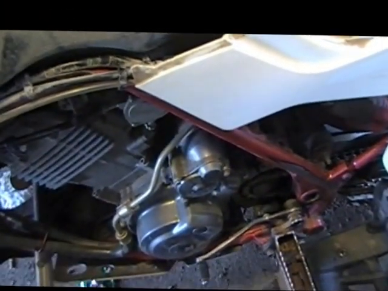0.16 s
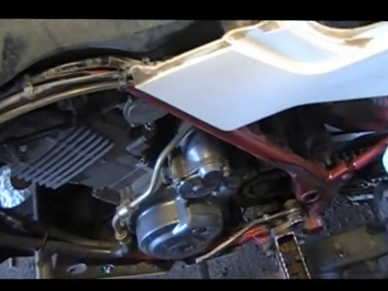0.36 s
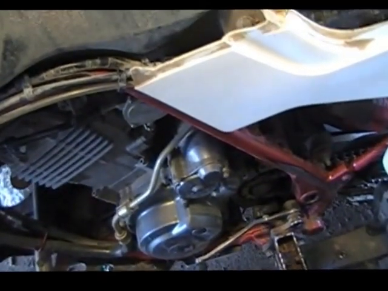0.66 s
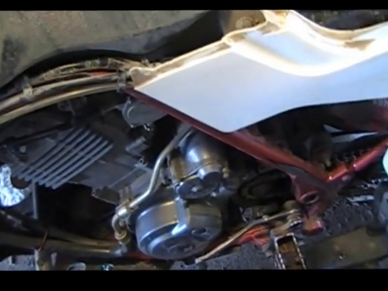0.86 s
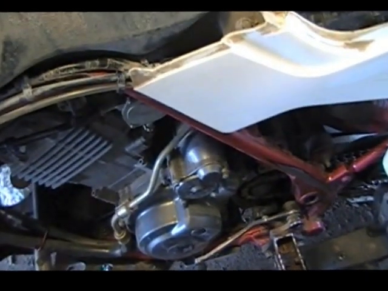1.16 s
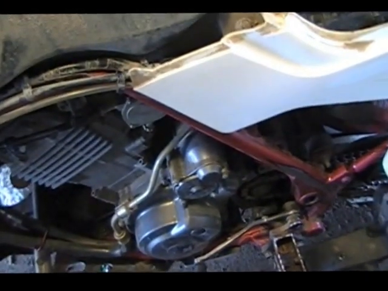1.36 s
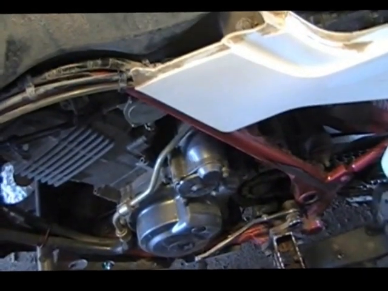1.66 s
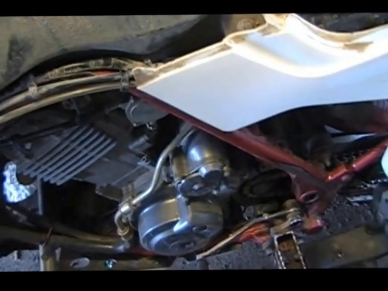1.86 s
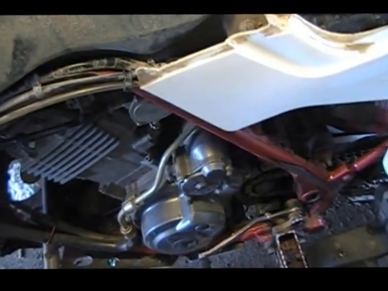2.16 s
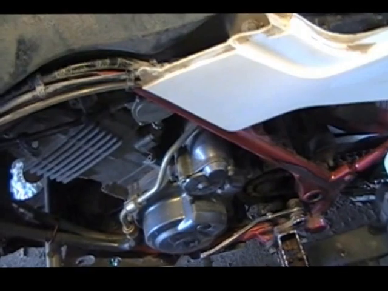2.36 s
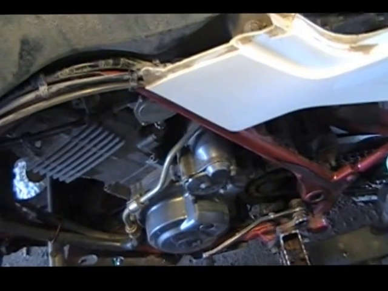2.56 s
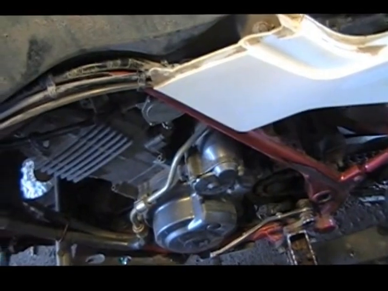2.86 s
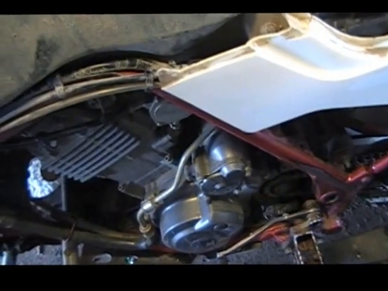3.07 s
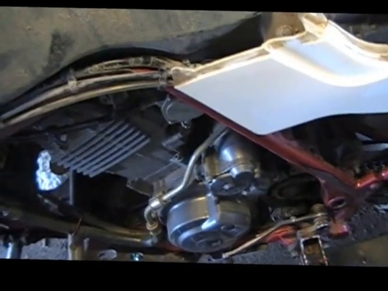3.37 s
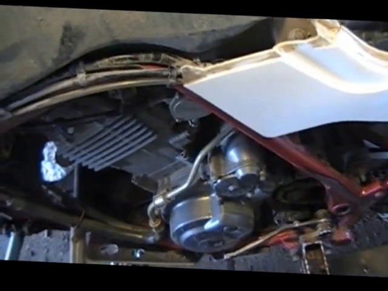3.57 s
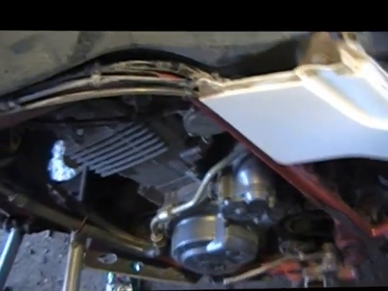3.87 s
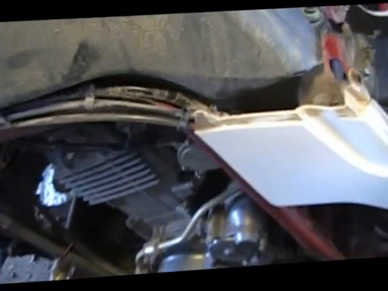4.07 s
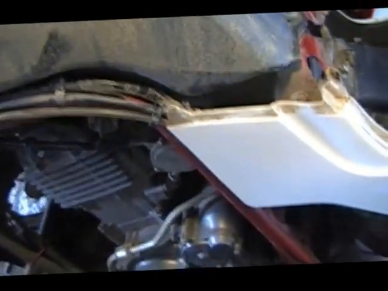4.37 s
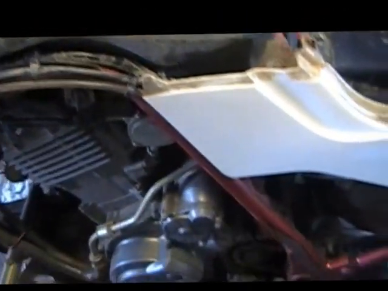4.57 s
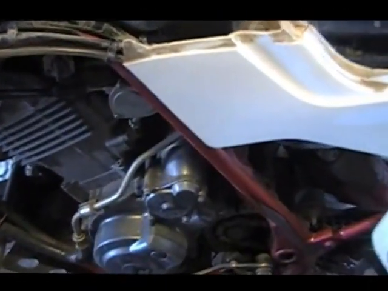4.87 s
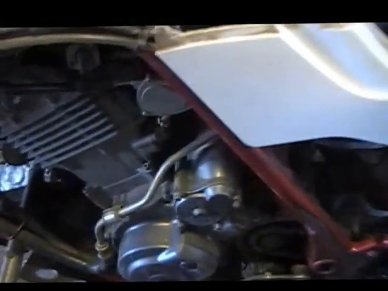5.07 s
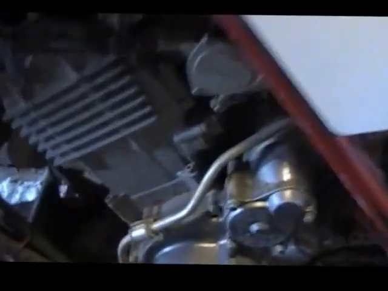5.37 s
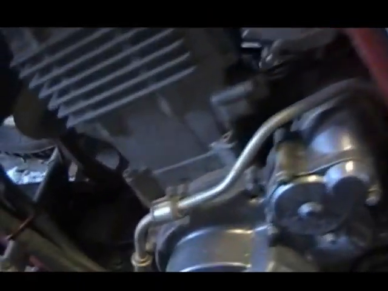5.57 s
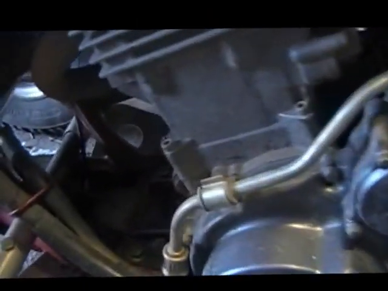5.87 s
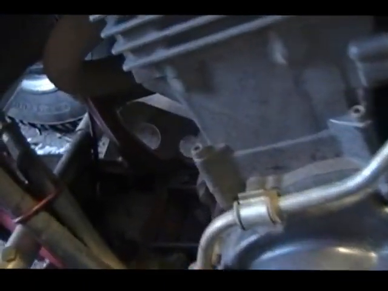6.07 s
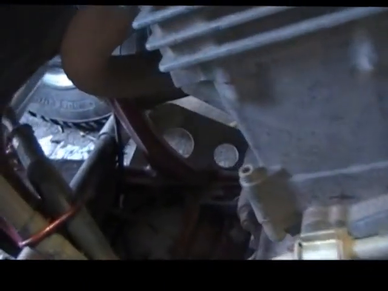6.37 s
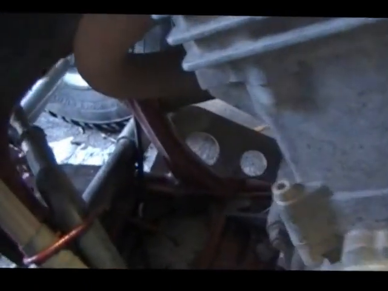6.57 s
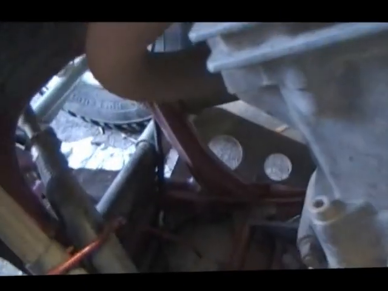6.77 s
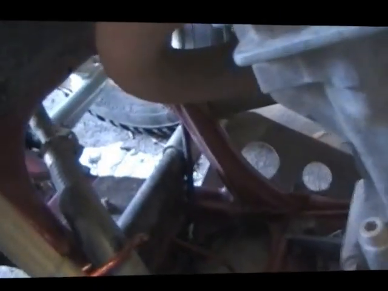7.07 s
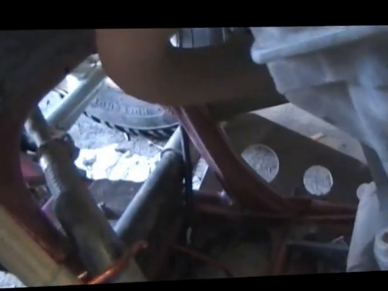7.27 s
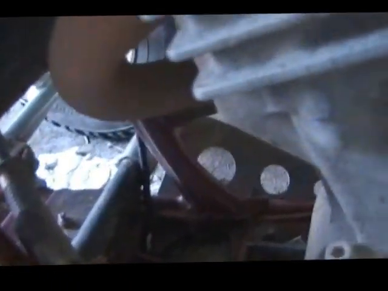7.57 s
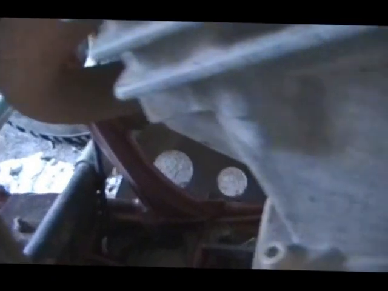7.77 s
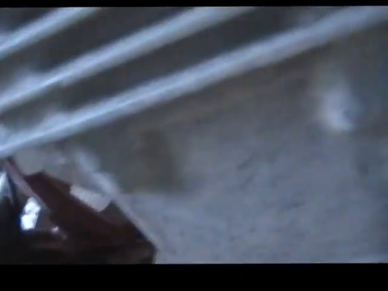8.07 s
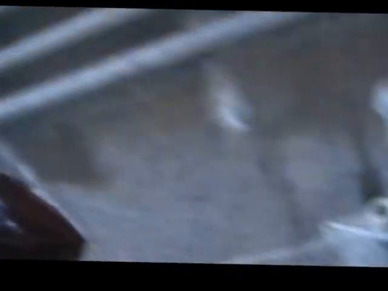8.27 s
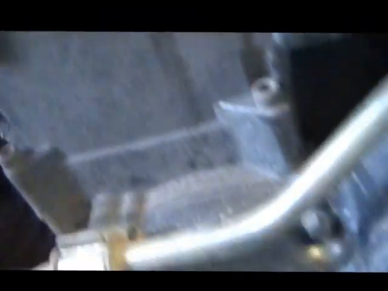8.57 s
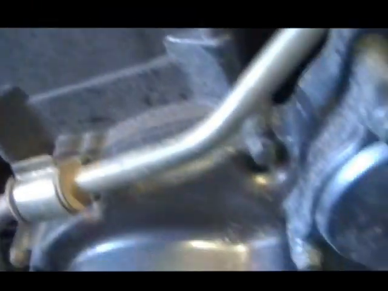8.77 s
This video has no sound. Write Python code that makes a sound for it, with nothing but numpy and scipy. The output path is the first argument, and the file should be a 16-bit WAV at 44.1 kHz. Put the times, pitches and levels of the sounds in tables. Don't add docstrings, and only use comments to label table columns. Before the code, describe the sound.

A faint knock dies away over still air and low hum. Clicks and a hard clack lead into labouring starter gears, a muffled kick, then a coasting whine. After a pause it cranks again and the small air-cooled engine starts, popping loudly and settling to a rapid steady idle. The near-mono camera microphone begins beside it and ends close to the fins, where bright mechanical clatter stands out over the softer exhaust.

```python
import sys
import numpy as np
from scipy import signal
from scipy.fft import rfft, irfft
from scipy.io import wavfile
from scipy.ndimage import uniform_filter1d

SR = 44100
rng = np.random.default_rng(int(sys.argv[2]) if len(sys.argv) > 2 else 0)


def log_audio(samples):
    frames = np.atleast_2d(samples).T
    limited = np.clip(frames, -1, 1)
    pcm = np.round(limited * 32767).astype(np.int16)
    wavfile.write(sys.argv[1], SR, pcm)


def attenuation_scalar(level_db):
    decades = np.asarray(level_db, float) / 20
    return 10 ** decades


N = 392931
t = np.arange(N) / SR
CATCH_S = 2.8914

# (frequency [Hz], signed share, time to fall 60 dB [s])
PIPE_RING = [(75, 0.21, 0.4), (147, -1.0, 0.066), (153, 0.46, 0.282), (193, -0.11, 0.261),
             (269, -0.72, 0.033), (289, 0.32, 0.175), (330, 0.52, 0.027), (445, 0.2, 0.035),
             (636, 0.03, 0.015)]
# (frequency [Hz], level [dB], time to fall 60 dB [s])
CAN_RING = [(334.5, -13.5, 0.061), (470, -66, 0.16), (528.6, -19.5, 0.21), (703, -22, 0.042)]
# (delay [ms], signed share)
ECHOES = [
    [(0.2, 1.03), (4.7, 0.3), (9.1, 0.25), (13.3, -0.37), (23.0, 0.15), (25.6, -0.3), (37.7, 0.14),
     (39.2, 0.2)],
    [(0.4, 0.98), (13.4, -0.36), (17.5, 1.27), (17.7, -1.2), (19.9, 0.21), (28.9, -0.53), (29.0, 0.4),
     (41.3, -0.2)],
    [(0.4, 0.8), (9.8, 0.39), (17.0, 0.58), (21.0, 0.34), (26.1, 0.24), (39.6, -0.11), (41.3, 1.12),
     (41.5, -1.31)],
]


def thumps():
    u = t[:5000]
    out = np.zeros((len(ECHOES), 5000))
    pipe = sum(share * attenuation_scalar(-60 * u / t60) * np.sin(2 * np.pi * hz * u) for hz, share, t60 in PIPE_RING)
    can = sum(attenuation_scalar(db - 60 * u / t60) * np.sin(2 * np.pi * hz * u) for hz, db, t60 in CAN_RING)
    ring = pipe + can * np.minimum(u / 0.026, 1)
    for heard, arrivals in zip(out, ECHOES):
        for ms, share in arrivals:
            add(heard, ms / 1000, share * ring)
    out *= np.clip((0.095 - u) / 0.035, 0, 1)
    return out / np.sqrt(np.mean(out[:, :2200] ** 2, axis=1))[:, None]


# (time [s], exhaust level [dB], nearness of metal [dB])
IDLE = [(2.98, -10.5, 5.5), (3.5, -10.5, 7), (4.0, -12.5, 4.5), (4.3, -15.5, 1.5), (5.2, -17.5, 1),
        (5.7, -17, 4), (6.05, -16, 6.5), (6.45, -16, 8), (7.0, -16, 7), (7.6, -15.5, 8.5), (8.0, -15, 9),
        (8.4, -14.5, 7.5), (8.8, -13, 8)]
# (time [s], place: 0 beside, 1 moving in, 2 close; past 2 the thump weakens)
CAMERA = [
    (2.9, 1),
    (3.7, 0.5),
    (4.2, 0.5),
    (5.4, 0.76),
    (6.1, 2.3),
    (9, 2.5),
]
# (time [s], level [dB], low-pass [Hz])
KICKS = [(1.0115, -7, 695), (1.106, -15.5, 160), (1.136, -19.5, 200), (1.219, -17, 158), (1.248, -19, 200),
         (1.385, -23.5, 150), (1.431, -19, 130), (1.55, -26, 129), (1.688, -32.5, 132), (2.297, -22.5, 140),
         (2.347, -23, 120), (2.48, -26, 120), (2.551, -7.5, 694), (2.653, -19, 170), (2.69, -21, 220),
         (2.767, -13.5, 597), (2.819, -18, 170)]


def exhaust():
    heard, out, fire = thumps(), np.zeros(N), at_angle(0)
    level = attenuation_scalar(np.interp(fire, *np.transpose(IDLE)[:2]) + 0.21 * rng.standard_normal(len(fire)))
    for s, gain, place in zip(fire, level, np.interp(fire, *np.transpose(CAMERA))):
        nearest_places = np.maximum(1 - abs(place - np.arange(len(ECHOES))), 0)
        add(out, s, gain * nearest_places @ heard)
    for s, db, hz in KICKS:
        add(out, s, attenuation_scalar(db) * signal.lfilter(*signal.butter(2, hz, fs=SR), heard[0]))
    kick_s, kick_db, _ = np.transpose(KICKS)
    rush = bursts(np.r_[fire, kick_s], np.r_[level, attenuation_scalar(kick_db)], 0.0093, 0.5)
    gas = band(band(rng.standard_normal(N), 71, 394), 50, 400)
    return out + attenuation_scalar(-11.0) * rush * evened(gas)


# (frequency [Hz], level [dB per Hz])
GRIND = [(88, -23), (150, -3), (270, 6), (450, 4), (694, 6), (812, 1.5), (2970, 2.5), (3210, 1.5),
         (4480, -7), (7320, 2), (12000, -15.5), (13700, -34), (16400, -100)]
# (frequency [Hz], width [Hz], level [dB])
HOUSING = [(2550, 120, -4), (3290, 55, -2), (3650, 50, -6), (3880, 60, -6), (5630, 90, -9), (6500, 70, -9),
           (7290, 80, -7), (8150, 70, -10)]
# (pinion bites [s], released [s], labouring level [dB], coasting fall [dB per s squared])
PRESSES = [
    (0.886, 1.66, -29, 393),
    (2.151, 2.89, -29, 68),
]
# (middle [s], half length [s], grind level [dB], whine level [dB], top whine [Hz])
SURGES = [(0.952, 0.075, -21.5, -32.5, 4300), (1.324, 0.064, -31.5, -39, 3400),
          (1.461, 0.084, -40.5, -40, 3300), (1.584, 0.038, -27, -35, 3300), (1.657, .035, -29, -34, 3700),
          (2.216, 0.067, -23, -32.5, 4300), (2.304, 0.063, -34, -50, 3300),
          (2.409, 0.055, -23, -26.5, 3500), (2.514, .035, -24, -35, 3740), (2.854, 0.15, -32, -53, 3300)]
# (level [dB], gain with effort [dB per dB], with coasting [dB per dB])
STRAIN = [(-32.5, 1.0944, 0.76), (-36, 0.94, 0.96), (-31.5, 0.65, .75), (-34, 0.5, 1.03)]
# (share of the whine's pitch, level [dB])
WHINE_ORDERS = [(.5, -18), (.76, -0.5), (1, 6), (1.33, -8.5)]


def starter():
    held, coast_db = np.zeros(N), np.zeros(N)
    for (bite, released, labour_db, fall), end in zip(PRESSES, [PRESSES[1][0], 9]):
        held += attenuation_scalar(labour_db) * (t > bite) * (t < end)
        coast_db -= fall * np.maximum(t - released, 0) ** 2 * (t < end)
    mid, half, grind_db, whine_db, top_hz = np.transpose(SURGES)[:, :, None]
    arch = np.maximum(1 - ((t - mid) / half) ** 2, 0)
    effort_db = 20 * np.log10(held + (attenuation_scalar(grind_db) * arch).sum(0) + 1e-9) + 30

    teeth = attenuation_scalar(1.8 * wobble(size=50) + 1.1 * wobble(size=600)) * rng.standard_normal(N)
    housing = sum(attenuation_scalar(db + 4 * wobble(size=1800)) * evened(resonate(teeth, hz, width))
                  for hz, width, db in HOUSING)
    grind = evened(colour(teeth, GRIND)) + attenuation_scalar(-15) * housing
    above_350, above_1500, above_5000 = [
        colour(grind, [(hz / 1.3, -60), (hz, -6), (hz * 1.3, 0)]) for hz in (350, 1500, 5000)]
    parts = [above_1500 - above_5000, above_5000, above_350 - above_1500, grind - above_350]
    out = sum(attenuation_scalar(db + slope * effort_db + fade * coast_db) * evened(part)
              for (db, slope, fade), part in zip(STRAIN, parts))

    nearest, strength = arch.argmax(0), arch.max(0)
    whine_hz = top_hz[nearest, 0] * (1 - 0.36 * (1 - strength))
    whine = sum(attenuation_scalar(db) * evened(resonate(teeth, share * whine_hz, 80)) for share, db in WHINE_ORDERS)
    return out * (held > 0) + whine * attenuation_scalar(whine_db[nearest, 0]) * strength ** 2


# (frequency [Hz], width [Hz], level close [dB], lost from beside [dB], lost under the fins [dB])
HEAD = [(2830, 45, -3, 6, 0), (3720, 70, 4, 10, 10), (4300, 60, 0, 6, -2), (6310, 300, -4, 0, 0),
        (7900, 700, -8, 0, 0)]
# (frequency [Hz], level [dB])
VALVE = [(1200, -24), (2500, -5), (4000, 13.5), (5000, 5.5), (7000, 9), (9000, 6), (12000, -7),
         (15500, -47)]


def valves():
    at, luck = at_angle(0.26), rng.standard_normal((len(at_angle(0)), 4))
    gain = attenuation_scalar(metal_db(at, part=0) + 6 + 0.75 * luck[:, 1])
    shape = bursts(at + 0.0014 * luck[:, 0], gain, 0.0019, 0.046)
    rattle = shape * attenuation_scalar(3 * wobble(size=40)) * rng.standard_normal(N)
    away = np.clip(1.8 - curve(CAMERA), 0, 1)
    under = np.interp(t, (6.95, 7.2), [0, 1])
    ring = 0
    for hz, width, db, lost_db, hid_db in HEAD:
        level = attenuation_scalar(db - lost_db * away - hid_db * under + 2 * wobble(size=3000))
        ring = ring + level * evened(resonate(rattle, hz, width))
    clatter = (evened(colour(rattle, VALVE)) + attenuation_scalar(-1) * evened(ring)) * np.std(rattle)

    at = at_angle(0.578)
    gain = attenuation_scalar(metal_db(at, part=1) + 14.5 + 2.5 * luck[:, 3])
    snap = bursts(at + 0.001 * luck[:, 2], gain, 0.0005, 0.016)
    snap *= rng.standard_normal(N) * np.interp(t, (3.1, 5.4), [0.2, 1])
    tick = body(band(snap, 2500, 8500), [(7300, 1400, 0), (4250, 150, -10), (2830, 120, -12)])
    tick = tick + attenuation_scalar(-16) * evened(colour(snap, VALVE))
    return clatter + evened(tick) * np.std(snap)


# (frequency [Hz], level [dB per Hz])
GEAR = [
    [(220, -11.5), (380, 6), (609, -4.5), (1010, -10.5), (1300, -11.5), (1470, -23.5), (1990, -16),
     (4650, -21), (7940, -20), (12000, -49), (13300, -84), (16400, -104)],
    [(220, -21), (380, -12), (521, -10.5), (918, -16.5), (1340, -15.5), (2250, -42.5), (2850, -15),
     (3240, -26.5), (4230, -22.5), (7810, -28), (12700, -55.5), (16400, -93)],
]
# (frequency [Hz], width [Hz], level [dB])
CASE = [(802, 35, 8.5), (1313, 30, 14), (1910, 320, 3), (2850, 11, 2), (4300, 34, -4)]
# (share of the cycle, level over the running gear [dB])
SLAPS = [(.97, 10), (0.66, 7), (0.82, 8), (0.42, 7)]
# (share of the cycle, frequency [Hz], width [Hz], time to fall 60 dB [s], level over the running gear [dB])
LINKS = [(0.815, 5600, 50, 0.032, 3), (0.54, 3720, 36, 0.043, 7.5), (0.92, 1930, 270, 0.082, 3.5),
         (1, 6460, 140, 0.01, -21)]


def running_gear():
    angle, close = 2 * np.pi * turns(), np.clip(curve(CAMERA) - 1, 0, 1)
    grit = attenuation_scalar(0.76 * wobble(size=60)) * rng.standard_normal(N)
    throb = attenuation_scalar(2.63 * np.cos(2 * angle - 4.2) + 1.98 * np.cos(angle - 2.3))
    beside, near = (colour(grit, points) for points in GEAR)
    beside, near = (x / np.std(band(x, 3000, 12000)) for x in (beside, near))
    case = attenuation_scalar(-4.5 + 2.9 * close) * evened(body(grit, CASE))

    slaps = 0
    for share, db in SLAPS:
        at = at_angle(share)
        slaps = slaps + bursts(at, attenuation_scalar(db + 1.9 * rng.standard_normal(len(at))), 0.0037, 0.08)
    slaps = slaps * evened(resonate(rng.standard_normal(N), 1330, 170))
    slaps *= attenuation_scalar(-2.5 * close)
    for share, hz, width, t60, db in LINKS:
        at = at_angle(share)
        shape = bursts(at, attenuation_scalar(db + 4.6 * rng.standard_normal(len(at))), 0.0058, t60)
        slaps += shape * evened(resonate(grit, hz, width))

    half_cycle = angle / (2 * np.pi) % 1 % 0.5
    gulp = np.exp(-((half_cycle - 0.34) / 0.07) ** 2)
    intake = attenuation_scalar(-1 - 2 * close) * gulp * evened(resonate(grit, 1200 + 2200 * half_cycle, 260))
    whirr = throb * ((1 - close) * beside + close * near + case) + slaps + intake
    return attenuation_scalar(metal_db(t, part=2)) * np.clip((t - 2.75) / 0.22, 0, 1) * whirr


# (time [s], peak level [dB], time to fall 60 dB [s], mids over treble [dB])
CLACKS = [(0.814, -35, 0.13, -13), (0.8868, 7, 0.022, -6), (1.0075, -1, 0.077, -7),
          (1.036, -10.5, 0.056, -2.5), (1.1286, -12.5, 0.056, -1.5), (1.251, -7.5, 0.053, -3),
          (1.332, 2.5, 0.041, -8.5), (1.487, -5.5, 0.077, -2), (1.577, 2, 0.028, -4), (2.15, 1, 0.052, -5),
          (2.329, -5, 0.2, -7), (2.497, -2.5, 0.055, -5), (2.552, -3.5, 0.088, -8), (2.58, -10, 0.035, -9),
          (2.68, -13, 0.072, -26), (2.7673, -10, 0.063, -3.5), (2.8723, -12, 0.04, 0)]


def clacks():
    s, db, t60, mids_db = np.transpose(CLACKS)
    t60 = np.maximum(t60, 0.01)
    noise = attenuation_scalar(2.2 * wobble(size=30)) * rng.standard_normal(N)
    treble = evened(band(colour(noise, GRIND), 2900, 15000))
    mids = evened(band(noise, 1000, 4500))
    high = bursts(s, attenuation_scalar(db - 10.0), 0.00013, t60) * treble
    return high + bursts(s, attenuation_scalar(db + mids_db - 7), 0.001, t60 * 1.4) * mids


# (frequency [Hz], level [dB per Hz])
AIR = [(18, -52), (30, -20), (64, 6), (88, 4.5), (109, -9), (170, 1.5), (345, -10.5), (740, -11),
       (1540, -20.5), (1910, -23.5), (3770, -26.5), (7270, -33), (16000, -65)]
# (frequency [Hz], width [Hz], level [dB])
HUMS = [(1920, 300, -71), (5100, 220, -83), (6900, 14, -87), (7800, 500, -79)]


def garage():
    noise = rng.standard_normal(N)
    air = attenuation_scalar(-54.5 + 0.31 * wobble(size=900)) * evened(colour(noise, AIR))
    hums = sum(attenuation_scalar(db + 2.8 * wobble(size=3000)) * evened(resonate(noise, hz, width))
               for hz, width, db in HUMS)
    knock = evened(colour(rng.standard_normal(N), [
        (100, 2), (400, 12.5), (1500, -8), (3000, -1.5), (4200, -11), (7000, -3.0), (13000, -30)]))
    beat = np.cos(np.pi * 30 * t) ** 2
    reed = attenuation_scalar(-66 + 4 * wobble(size=1200)) * beat ** 5 * np.sin(2 * np.pi * 2830 * t)
    return air + hums * attenuation_scalar(5.8 * beat) + reed + attenuation_scalar(-28.5 - 60 * t / 0.22) * knock


def room(x, t60):
    taps = rng.choice([-1.0, 0, 1.0], 12000, p=[0.03, 0.94, 0.03]) * attenuation_scalar(-60 * t[:12000] / t60)
    return signal.oaconvolve(x, taps / np.linalg.norm(taps))[:N]


# (time [s], firings per second [Hz])
SPEED = [(2.89, 11.04), (3.24, 10.627), (3.43, 11.555), (3.97, 12.838), (4.16, 12.712), (4.79, 14.162),
         (4.92, 13.857), (5.41, 13.761), (5.56, 14.324), (6.03, 13.376), (6.27, 14.826), (7.01, 14.132),
         (7.15, 14.521), (7.35, 13.934), (7.82, 16.466), (8.2, 14.67), (8.36, 14.39), (8.93, 14.044)]


def turns():
    return np.cumsum(curve(SPEED) * (t > CATCH_S)) / SR


def at_angle(share):
    done = turns()[t > CATCH_S]
    return np.interp(np.arange(np.ceil(done[-1])) + share, done, t[t > CATCH_S], right=N / SR)


# (level when far [dB], gain with nearness [dB per dB])
METAL = [(-40.5, 2), (-41, 1.03), (-45, 1.09)]


def metal_db(s, part):
    far_db, slope = METAL[part]
    idle_s, _, nearness_db = np.transpose(IDLE)
    return far_db + slope * np.interp(s, idle_s, nearness_db)


def evened(x):
    return x / np.sqrt(np.mean(x ** 2) + 1e-20)


def curve(rows, column=1, **ends):
    rows = np.asarray(rows, float)
    return np.interp(t, rows[:, 0], rows[:, column], **ends)


def colour(x, points):
    hz, db = np.transpose(points)
    bins_hz = np.fft.rfftfreq(N, 1 / SR)
    return irfft(rfft(x) * attenuation_scalar(np.interp(np.log(bins_hz + 1), np.log(hz), db)), N)


def band(x, lo_hz, hi_hz):
    return signal.sosfilt(signal.butter(2, [lo_hz, hi_hz], "bandpass", fs=SR, output="sos"), x)


def resonate(x, hz, width):
    turn = np.exp(2j * np.pi * np.cumsum(hz * np.ones(N)) / SR)
    r = np.exp(-np.pi * width / SR)
    return 2 * (turn * signal.lfilter([1 - r], [1, -r], x / turn)).real


def body(x, modes):
    return sum(attenuation_scalar(db) * evened(resonate(x, hz, width)) for hz, width, db in modes)


def wobble(size):
    return evened(uniform_filter1d(uniform_filter1d(rng.standard_normal(N), size), size))


def add(mix, s, sound):
    part = mix[int(round(s * SR)):][:len(sound)]
    part += sound[:len(part)]


def bursts(times, gains, rise, t60):
    u, out = t[:4000], np.zeros(N)
    rise, t60 = rise * np.ones(len(times)), t60 * np.ones(len(times))
    for s, gain, up, down in zip(times, gains, rise, t60):
        add(out, s, gain * (1 - np.exp(-u / up)) * attenuation_scalar(-60 * u / down))
    return out


# (frequency [Hz], width [Hz], share removed before the camera lifts, share removed after)
BOUNCE = [(431, 132, 1, 0.012), (348, 38, .05, -0.23)]
# (frequency [Hz], side over middle [dB])
SPREAD = [(40, -34), (70, -20), (140, -25), (250, -22), (500, -20), (1000, -20), (2000, -19), (4500, -17),
          (6500, -13), (8500, -4), (12000, -7.5), (16000, -12)]


def scene():
    metal = valves() + clacks()
    engine, gear = exhaust() + starter(), running_gear()
    lift_s = (4.15, 4.8)
    engine = engine - sum(np.interp(t, lift_s, shares) * resonate(engine, hz, width)
                          for hz, width, *shares in BOUNCE)
    gear = gear - 0.82 * resonate(gear, 435, 87)
    mid = engine + gear + metal + attenuation_scalar(-29.0) * room(metal, 0.13) + garage()
    z = signal.stft(mid, nperseg=256)[2]
    scattered = signal.istft(z * np.exp(2j * np.pi * rng.random(z.shape)), nperseg=256)[1][:N]
    side = colour(scattered, SPREAD) * attenuation_scalar(3.6)
    return np.array([mid + side, mid - side])


def band_limit(x):
    return signal.sosfilt(signal.butter(12, 16530, fs=SR, output="sos"), x)


def record(dry):
    cut = signal.sosfilt(signal.butter(4, 40, "highpass", fs=SR, output="sos"), dry)
    cut = signal.sosfilt(signal.butter(10, 14200, fs=SR, output="sos"), cut)
    return band_limit(np.clip(cut, -1, 1))


dry = scene()
out = record(dry)
log_audio(out)
```